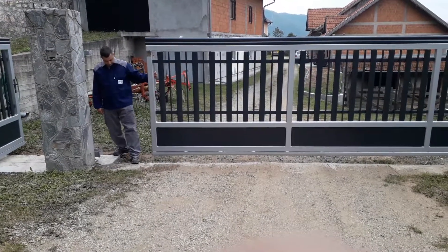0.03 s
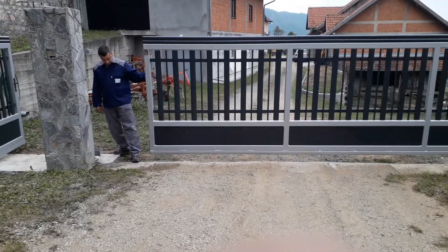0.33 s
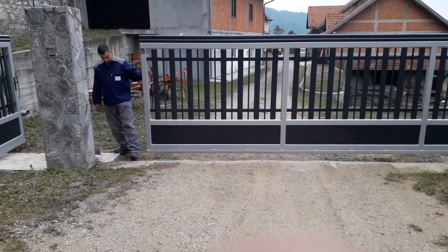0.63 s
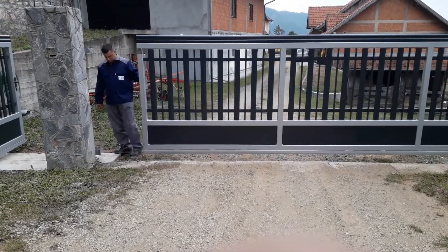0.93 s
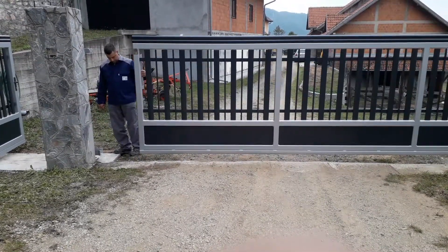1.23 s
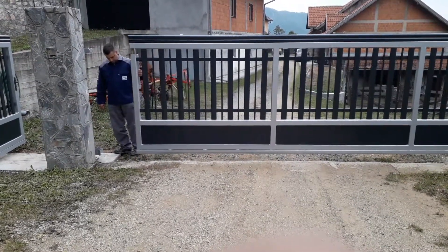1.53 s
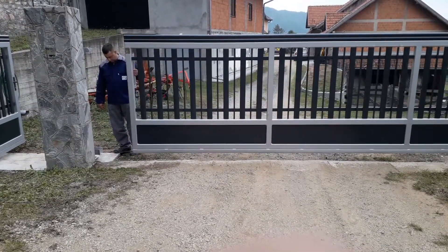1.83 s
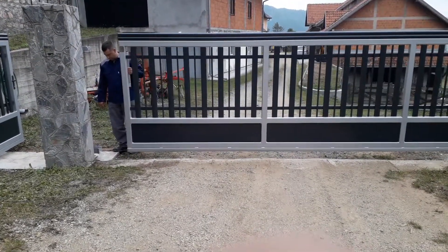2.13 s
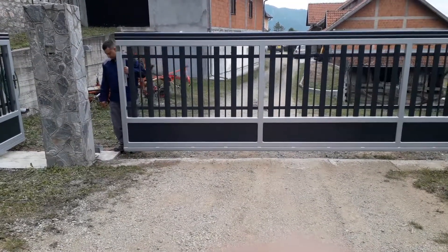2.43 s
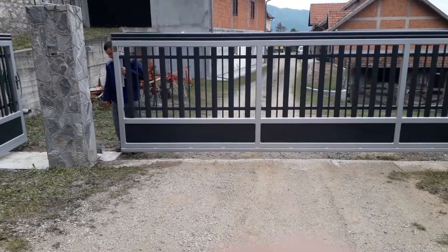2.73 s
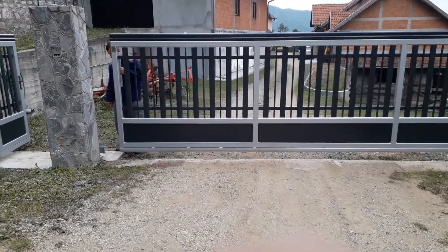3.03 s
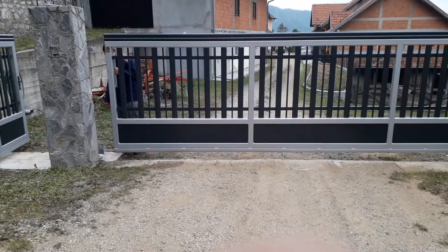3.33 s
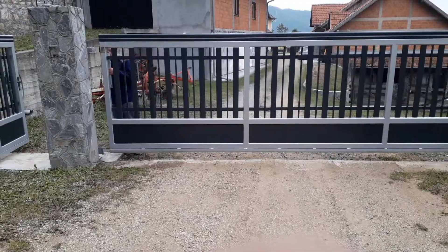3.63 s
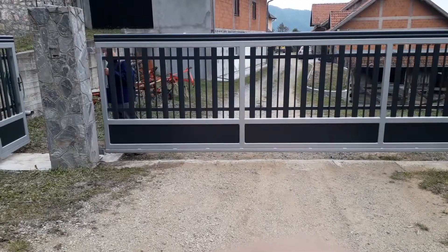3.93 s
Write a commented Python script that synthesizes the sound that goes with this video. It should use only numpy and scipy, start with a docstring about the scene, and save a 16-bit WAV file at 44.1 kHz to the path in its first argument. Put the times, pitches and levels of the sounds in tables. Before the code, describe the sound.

Low rumble of a sliding metal gate being pushed, with clicks, knocks and faint shoe scuffs.

```python
"""In a quiet yard, a long metal gate is pushed slowly along its track.
The rollers shake the frame and its panels, which rumble and boom, louder as the gate gathers speed.
The wheels roar on the track and knock over rough spots, loose fittings click and the bars ring faintly.
Shoes scuff on grit, a dry axle sings in short spells, and a roller bearing squeaks once and later
starts to hiss. Behind it all lies the soft hush of still air."""
import sys
import numpy as np
from scipy import signal
from scipy.fft import rfft, irfft
from scipy.io import wavfile

SR = 44100
rng = np.random.default_rng(int(sys.argv[2]) if len(sys.argv) > 2 else 0)


def wav_record(signal):
    """Record a signal, one row per channel, as 16-bit PCM in the file named by sys.argv[1]."""
    frames = np.transpose(np.atleast_2d(signal))
    bounded = np.clip(frames, -1, 1)
    # unit amplitude maps onto the largest positive 16-bit level
    quanta = np.round(bounded * 32767).astype(np.int16)
    wavfile.write(sys.argv[1], SR, quanta)


N = 176400
T = np.arange(N) / SR


def from_db(db):
    """Turn decibels into a number to multiply by."""
    return 10 ** (np.asarray(db) / 20)


def unit_power(x):
    """Scale a signal so its average power is 1."""
    return x / np.sqrt(np.mean(x ** 2) + 1e-20)


def curve(rows):
    """Join (time_s, value) points with straight lines."""
    return np.interp(T, *np.transpose(rows))


def noise(spectrum):
    """Noise of power 1, its tone shaped by (pitch_hz, level_db) points."""
    hz, db = np.transpose(spectrum)
    log_hz = np.log(np.arange(N // 2 + 1) * SR / N + 1e-3)
    gain = from_db(np.interp(log_hz, np.log(hz), db))
    return unit_power(irfft(rfft(rng.standard_normal(N)) * gain, N))


def drift(rate_hz):
    """A smooth random wobble of typical size 1; a higher rate wobbles faster."""
    hz = np.arange(N // 2 + 1) * SR / N
    return unit_power(irfft(rfft(rng.standard_normal(N)) / (1 + (hz / rate_hz) ** 2), N))


def keep_range(x, hz, kind, order):
    """Let the "low" side, the "high" side or a middle "band" through."""
    return signal.sosfilt(signal.butter(order, hz, kind, fs=SR, output="sos"), x)


def ring(x, hz, width_hz):
    """Make x ring at one pitch (a mode); the narrower the width, the longer it rings."""
    r = np.exp(-np.pi * width_hz / SR)
    feedback = [1, -2 * r * np.cos(2 * np.pi * hz / SR), r * r]
    ringing = np.sqrt((1 - r * r) / 2) * signal.lfilter([1, 0, -1], feedback, x)
    return keep_range(ringing, [hz / np.sqrt(2), min(hz * np.sqrt(2), SR / 2 - 1)], "band", order=2)


def rubbed(modes):
    """Random contact keeps (pitch_hz, width_hz, level_db) modes ringing."""
    lead_in = SR // 2  # lets the ringing build up
    out = 0
    for hz, width, db in modes:
        ringing = ring(rng.standard_normal(N + lead_in), hz, width)[lead_in:]
        out += from_db(db) * unit_power(ringing)
    return unit_power(out)


def burst(start_s, hold_s, fade_s):
    """The shape of a hit: a 1 ms rise, a short hold, then a 60 dB drop over fade_s."""
    rise = np.clip((T - start_s) / .001, 0, 1)
    return rise * from_db(-60 * np.clip((T - start_s - hold_s) / fade_s, 0, 2))


# How hard the rollers shake the frame: time_s, level_db
FRAME_SHAKE = [(0, -77.5), (.19, -73.5), (.25, -62), (.5, -58.5), (.62, -54.5), (.85, -52.5), (1.08, -52),
               (1.27, -48.5), (1.45, -54.5), (1.8, -52.5), (2.12, -50.5), (2.2, -46), (2.5, -46),
               (2.85, -48), (3.1, -46), (3.45, -46.5), (3.75, -44), (4, -47.5)]
# The frame's notes: pitch_hz, width_hz, halfway_level_db, change_db_per_s
FRAME_MODES = [(53.3, 6.8, -39, 0), (72, 6.9, -15.5, -1.5), (95.4, 6.3, -9.5, -5), (117.6, 5.8, 0, 1),
               (140.9, 6.8, 0.5, -1), (162.9, 8.1, 1.5, -2), (188.8, 6.5, -1, 1.5), (217.1, 8.2, -4.5, 2.5),
               (249.8, 6.6, -1, -1), (266.1, 5.5, -1, -0.5), (314, 8, -5.5, -2), (354, 12, -9.5, 2.5),
               (383.2, 16, -10, 1), (430, 30, -9.5, -1), (506, 82, -15.5, 0.5)]

def frame_rumble():
    """The rollers shake the frame; as they travel along it, each note gains or loses strength."""
    halfway_s = 2.0
    rumble = 0
    for hz, width, db, db_per_s in FRAME_MODES:
        rumble += rubbed([(hz, width, 0)]) * from_db(db + db_per_s * (T - halfway_s))
    return keep_range(rumble, 650, "low", order=4) * from_db(curve(FRAME_SHAKE) - 4.5)


# How the panels' boom swells and sinks: time_s, relative_level_db
BOOM_LEVEL = [(0, -92), (.1, -56), (.17, -72), (.22, -53.5), (.39, -55), (.5, -61), (.61, -46.5),
              (.7, -55.5), (.82, -37.5), (.86, -48), (1.0, -39.5), (1.06, -47.5), (1.17, -42), (1.24, -54),
              (1.48, -49), (1.56, -38), (1.615, -77), (1.66, -40), (1.73, -38.5), (1.785, -70),
              (1.86, -35.5), (1.905, -56), (1.94, -35.5), (1.99, -45.5), (2.06, -34), (2.115, -49),
              (2.18, -31), (2.27, -68), (2.33, -53), (2.378, -26.5), (2.42, -44.5), (2.58, -39.5),
              (2.8, -49.5), (3.3, -47.5), (3.55, -46.5), (3.75, -43), (4, -43)]
# The note of the boom: time_s, pitch_hz
BOOM_PITCH = [(0, 140.6), (.65, 143), (.8, 148.2), (.92, 142.1), (1.25, 146), (1.6, 146.1), (1.75, 150),
              (1.87, 145.1), (2.05, 152.9), (2.38, 151), (2.6, 141.3), (3.3, 152), (4, 135.9)]

def panel_boom():
    """The panels vibrate at their main low note, a little unsteady in pitch and loudness."""
    wander_hz, roughness = 2.9, 0.21
    pitch_hz = curve(BOOM_PITCH) + wander_hz * drift(11.2)
    tone = np.sqrt(2) * np.sin(2 * np.pi * np.cumsum(pitch_hz) / SR)
    return tone * (1 + roughness * drift(17)) * from_db(curve(BOOM_LEVEL) - 2)


# How loudly the wheels run on the track: time_s, relative_level_db
TRACK_LEVEL = [(0, -83), (.21, -83.5), (.25, -74), (.35, -73.5), (.58, -75.5), (.67, -66), (.85, -72),
               (1.08, -67.5), (1.22, -63), (1.5, -72.5), (1.95, -69.5), (2.06, -68), (2.22, -62),
               (2.46, -59), (2.78, -62.5), (3.05, -59), (3.22, -60), (3.33, -57), (3.5, -61), (3.7, -59.5),
               (4, -61.5)]
# The tone of their roar: pitch_hz, level_db
TRACK_TONE = [(350, -44), (520, -5.5), (630, 1), (775, 5.5), (960, 1.5), (1110, -2), (1260, -10),
              (1420, -24.5), (2000, -21), (3000, -29), (5000, -47), (16000, -58)]
# The track's own notes: pitch_hz, width_hz, level_db
TRACK_MODES = [(771, 19, 1), (858, 40, -0.5), (1017, 40, -4.5), (1101, 30, -4.5)]

def track_roar():
    """The wheels make a wavering roar on the track, which rings along."""
    waver_db = 1.5
    roar = from_db(-.5) * noise(TRACK_TONE)
    ringing = from_db(-6.5) * rubbed(TRACK_MODES)
    return (roar + ringing) * from_db(curve(TRACK_LEVEL) + waver_db * drift(15))


# Clicks of the fittings: start_s, relative_level_db, extra_treble_db
CLICKS = [(0.2289, -52.5, 3.5), (0.4344, -67.5, -2), (0.6476, -56, 3.5), (0.8532, -63.5, 2.5),
          (0.906, -60.5, -3.5), (1.0181, -63.5, -3.5), (1.2395, -65, -3), (1.327, -54, -0.5),
          (1.4633, -66.5, -0.5), (1.709, -70, -3.5), (2.1219, -56.5, -3.5), (2.2191, -67, -6)]
# The first touch and the bounces within each click: delay_s, level_db
BOUNCES = [(0, 0), (.016, -16), (.031, -17)]
# The fittings' notes: pitch_hz, width_hz, level_db
FITTING_MODES = [(817, 150, -10), (1090, 36, -5.5), (2140, 270, -5.5), (2240, 69, -6), (2946, 190, -4.5),
                 (3210, 340, -5), (3900, 880, -2.5), (6150, 820, -11), (7700, 700, 1), (9040, 42, -9.5),
                 (9490, 150, -4.5), (10000, 240, -6), (14100, 700, -5), (15200, 600, -12)]

def fitting_clicks():
    """A fitting strikes, bounces and chatters, leaving a ringing tail that is weaker in the treble."""
    hold_s, strike_fade_s, tail_fade_s = .007, 0.041, 0.29
    treble_hz, top_hz, chatter_db = 5500, 12000, 2.5
    tail_db, tail_db_per_octave = -4, -5
    starts, level_db, treble_db = np.transpose(CLICKS)
    strikes = np.zeros((len(starts), N))
    for strike, start in zip(strikes, starts):
        for delay, db in BOUNCES:
            strike += (from_db(db) * burst(start + delay, hold_s, strike_fade_s)) ** 2
    tails = np.array([burst(start, hold_s, tail_fade_s) for start in starts]) ** 2
    top_db = .6 * (level_db - level_db.max())  # softer clicks lose their highest notes
    chatter = unit_power(from_db(chatter_db * drift(690)))
    out = 0
    for hz, width, db in FITTING_MODES:
        power = from_db(level_db + treble_db * (hz > treble_hz) + top_db * (hz > top_hz)) ** 2
        tail_gain = from_db(tail_db + tail_db_per_octave * max(np.log2(hz / 3000), 0))
        strength = np.sqrt(power @ strikes + tail_gain ** 2 * (power @ tails))
        force = strength * chatter * rng.standard_normal(N)
        out += from_db(db - 4.5) * ring(force, hz, width)
    return out


# Dull knocks of the rollers: start_s, level_db
KNOCKS = [(1.1675, -54.5), (1.80, -68), (1.931, -74), (2.0318, -62.5), (2.068, -56.5), (2.08, -62.5),
          (2.4269, -60.5), (2.672, -60), (2.69, -77)]
# The tone of a knock: pitch_hz, level_db
KNOCK_TONE = [(400, -20), (800, 13), (1150, 5.5), (1500, 2), (2200, 1), (3100, 0.5), (4200, -4.5),
              (5500, -12), (8000, -10), (11000, -28), (16000, -35)]

def roller_knocks():
    """The rollers bump over rough spots of the track: a crack and a short tail."""
    power = 0
    for start, db in KNOCKS:
        crack = burst(start, hold_s=0.0013, fade_s=0.041)
        tail = from_db(-5) * burst(start, hold_s=0, fade_s=0.32)
        power += from_db(db) ** 2 * (crack ** 2 + tail ** 2)
    return noise(KNOCK_TONE) * np.sqrt(power)


# Scuffs of the shoes: peak_s, rise_s, fall_s, level_db, extra_treble_db
SCUFFS = [(.07, 0.012, 0.039, -66, -14), (.628, 0.012, 0.026, -71, 7), (.715, 0.06, .06, -62, -4),
          (.935, 0.055, .045, -61, -5), (1.16, .04, .04, -69, -9), (1.246, 0.0071, 0.027, -62.5, 7),
          (1.52, 0.093, .07, -74.5, 7), (1.66, 0.032, 0.068, -69, -0.5), (2.05, 0.084, 0.068, -73, 1.5),
          (2.29, 0.11, .12, -75.5, 8.5), (2.303, 0.0093, 0.032, -56, -3), (2.388, 0.0048, 0.015, -69, 7),
          (2.58, .04, .05, -70.5, -1), (2.904, 0.0079, .05, -68, -1), (3.11, 0.083, .06, -69.5, -11),
          (3.53, 0.01, 0.018, -58, -1), (3.56, 0.17, .1, -69.5, -4)]
# The tone of crunching grit: pitch_hz, level_db
GRIT_TONE = [(600, -13), (1500, -9), (2300, -12), (3200, -0.5), (3950, 1.5), (5000, -3.5), (6300, -4.5),
             (7700, 1), (8800, -12.5), (11000, -20), (16000, -12)]

def shoe_scuffs():
    """Grit crunches under a sole: grainy noise that swells and dies, duller or brighter each time."""
    grain_db = 1.5
    low_power = high_power = 0
    for peak, rise, fall, db, treble_db in SCUFFS:
        from_peak = np.maximum((peak - T) / rise, (T - peak) / fall)
        swell = from_db(db) * np.exp(-np.minimum(from_peak, 20))
        low_power += swell ** 2
        high_power += (from_db(treble_db) * swell) ** 2
    grit = unit_power(noise(GRIT_TONE) * from_db(grain_db * drift(200)))
    low = np.sqrt(low_power) * keep_range(grit, 4700, "low", order=3)
    high = np.sqrt(high_power) * keep_range(grit, 4000, "high", order=3)
    return low + high


# How loudly the bars ring: time_s, level_db
BAR_LEVEL = [(0, -87), (.22, -80.5), (.27, -69), (.36, -82.5), (.6, -82.5), (.8, -82), (.96, -70.5),
             (1.1, -80), (1.3, -73), (1.36, -66), (1.43, -81.5), (1.68, -77.5), (1.87, -82), (2.1, -77),
             (2.15, -69), (2.3, -77), (2.57, -81), (2.65, -83), (2.69, -67.5), (2.78, -83), (3.1, -84),
             (3.3, -82), (3.55, -76), (3.75, -81.5), (4, -82)]
# The bars' notes: pitch_hz, width_hz, level_db
BAR_MODES = [(2151, 130, 0), (2358, 46, -4), (2881, 75, -2), (3106, 92, -2), (3300, 190, -1),
             (3642, 95, -6)]

def bar_ringing():
    """The bars ring faintly while the gate shakes, with a fine rattle."""
    rattle_db = 2
    return rubbed(BAR_MODES) * from_db(curve(BAR_LEVEL) + rattle_db * drift(90))


# When the axle sings: middle_s, half_length_s, level_db
AXLE_SPELLS = [(.075, 0.025, -84), (.3, 0.051, -73.5), (.385, .04, -77), (.735, 0.061, -70),
               (.94, 0.039, -73), (1.4, 0.064, -85), (1.54, 0.029, -84), (1.68, 0.1, -78),
               (1.815, 0.011, -71.5), (2.15, 0.023, -76), (3.61, 0.04, -73.5)]
# The axle's notes: pitch_hz, width_hz, level_db
AXLE_MODES = [(3820, 160, 0.65), (4080, 170, -2.7)]

def axle_singing():
    """A dry axle rubs and sings in short, thin, metallic spells."""
    swells = 0
    for middle, half_length, db in AXLE_SPELLS:
        swells += from_db(db) * np.exp(-np.minimum(((T - middle) / half_length) ** 2, 20))
    return rubbed(AXLE_MODES) * swells


# How loudly the bearing hisses: time_s, level_db
BEARING_LEVEL = [(0, -85), (2.8, -90.5), (3.1, -81), (3.25, -77.5), (3.6, -76.5), (4, -81)]
# The bearing's high notes: pitch_hz, width_hz, level_db
BEARING_MODES = [(7330, 540, -0.5), (7940, 180, 2.5)]

def bearing_hiss():
    """A dry bearing hisses and once gives a thin, flickering squeak."""
    squeak_s, half_length_s, squeak_db, flicker_db = 1.625, 0.084, -76, 4
    swell = np.exp(-((T - squeak_s) / half_length_s) ** 2)
    squeak = ring(rng.standard_normal(N), hz=12600, width_hz=1700) * swell
    hiss = rubbed(BEARING_MODES) * from_db(curve(BEARING_LEVEL))
    return hiss + from_db(squeak_db + flicker_db * drift(60)) * squeak


# The tone of still air and faint hiss: pitch_hz, level_db
AIR_TONE = [(20, -6.5), (60, 27), (130, 29), (300, 14), (500, 9.5), (900, -12), (1500, 5.5), (2200, -5),
            (4000, 1.5), (5200, 1), (6500, 0), (7600, 3.5), (8900, -6), (10500, -3), (13500, 0.5),
            (16000, -0.5)]

def still_air():
    """The yard's steady low hush, with a faint hiss on top."""
    return from_db(-67.5) * noise(AIR_TONE)


def scene():
    """The gate stands straight ahead; only a faint hiss differs between the ears."""
    rumble = keep_range(frame_rumble() + track_roar() + panel_boom(), 60, "high", order=4)
    centre = rumble + bar_ringing() + axle_singing() + fitting_clicks() + roller_knocks()
    centre += shoe_scuffs() + bearing_hiss() + still_air()
    side = from_db(-79) * unit_power(keep_range(rng.standard_normal(N), 5000, "high", order=1))
    return np.array([centre + side, centre - side])


def record(dry):
    """Cut away the very highest treble steeply."""
    cutoff_hz = 15750
    return signal.sosfilt(signal.ellip(10, .1, 80, cutoff_hz, fs=SR, output="sos"), dry)


dry = scene()
out = record(dry)
wav_record(out)
```